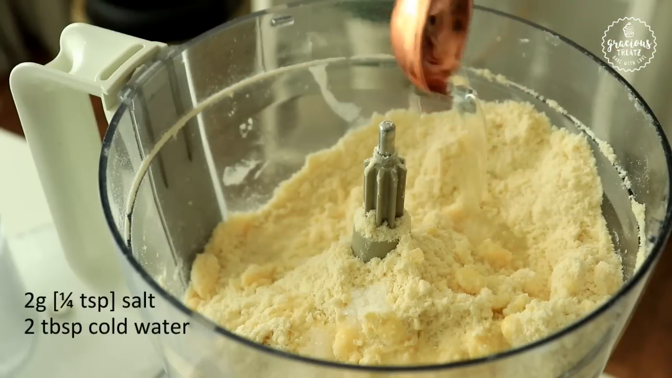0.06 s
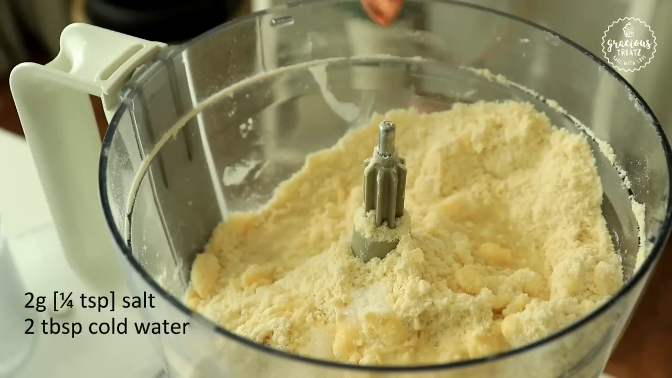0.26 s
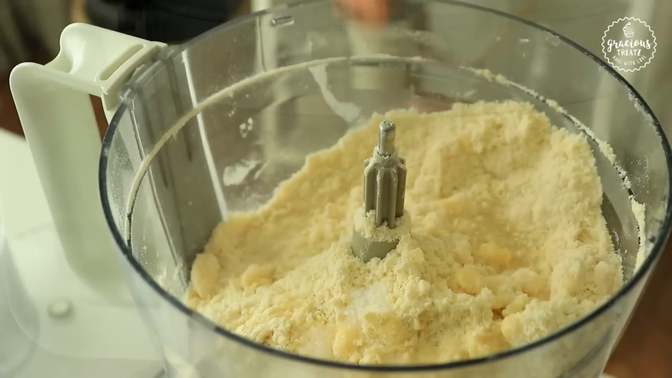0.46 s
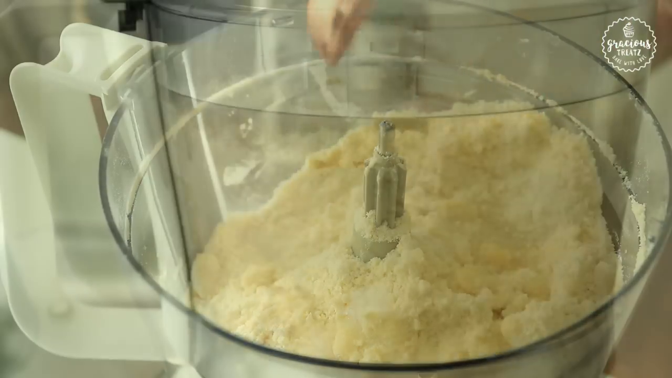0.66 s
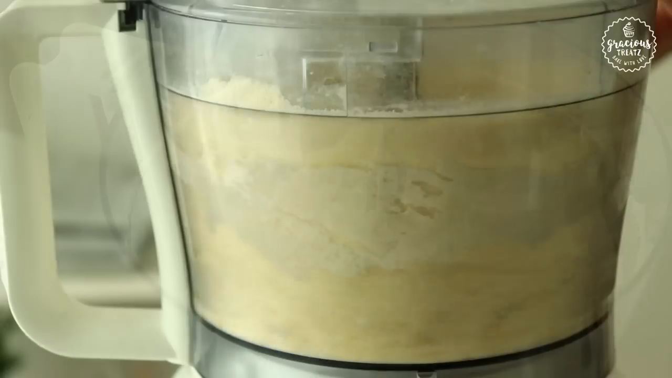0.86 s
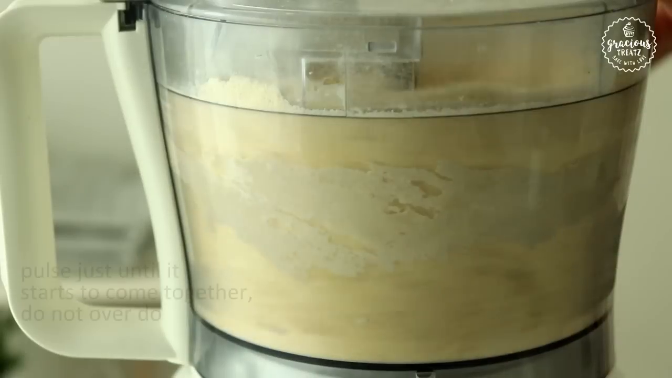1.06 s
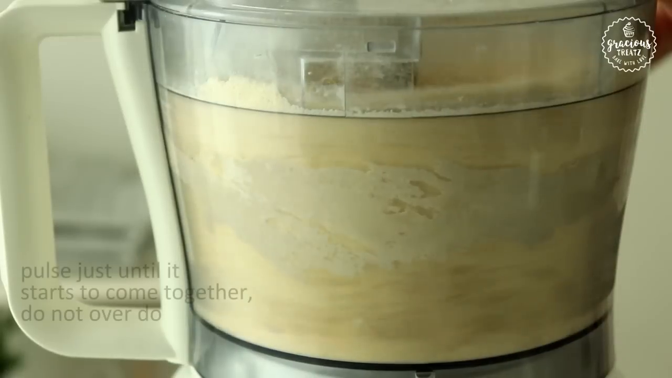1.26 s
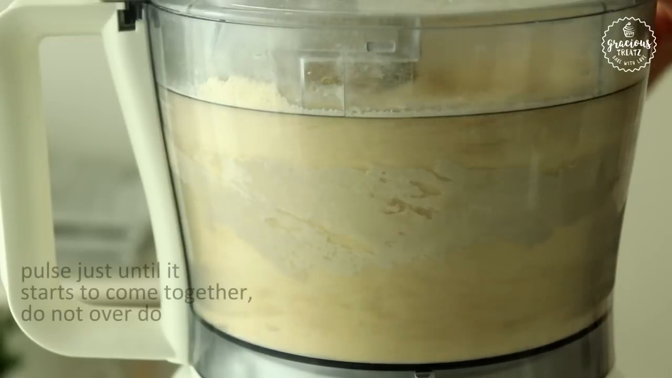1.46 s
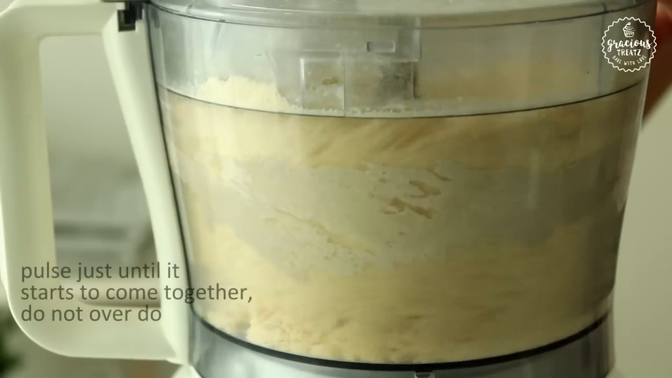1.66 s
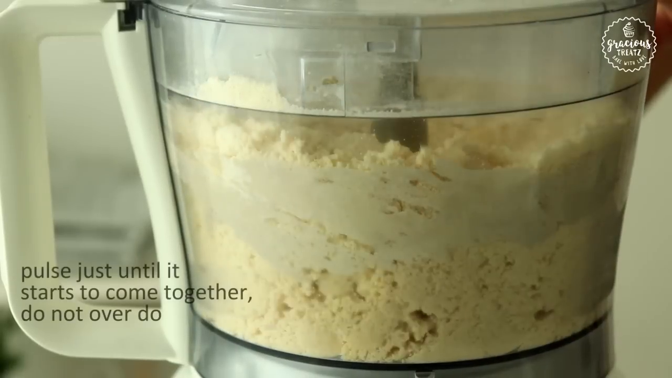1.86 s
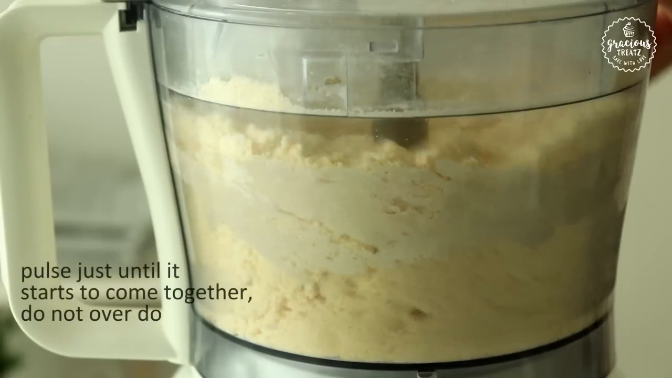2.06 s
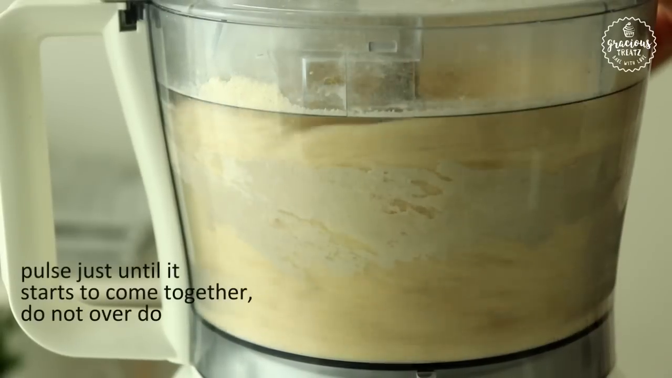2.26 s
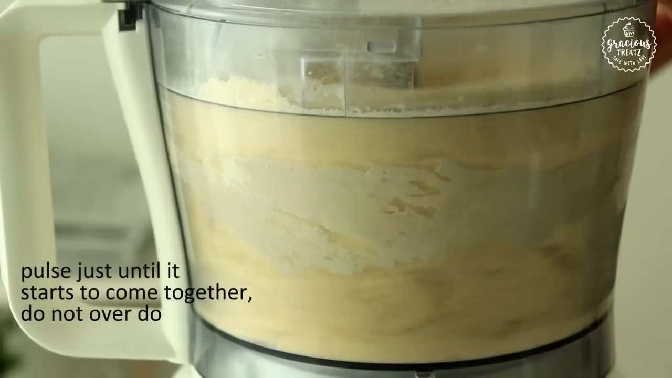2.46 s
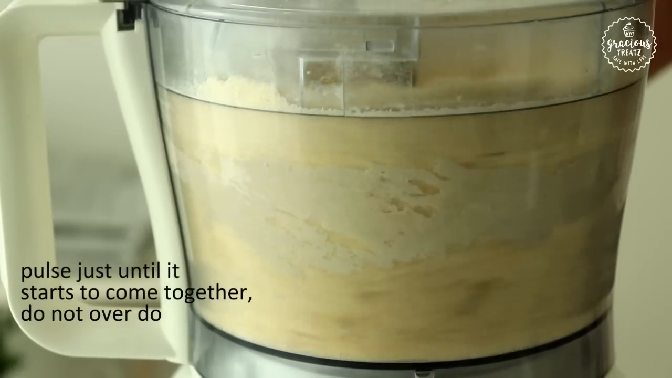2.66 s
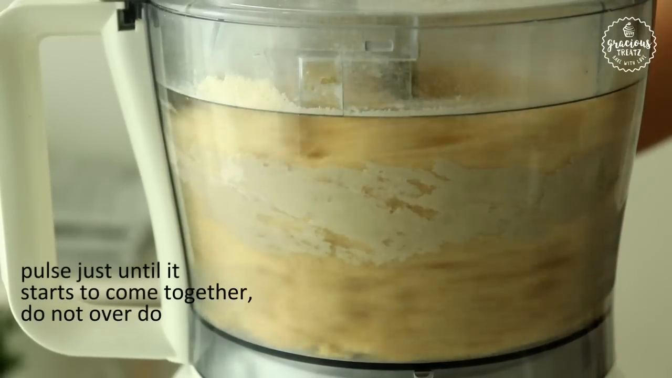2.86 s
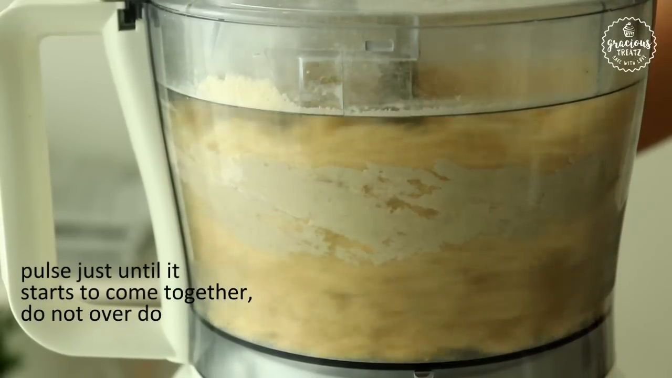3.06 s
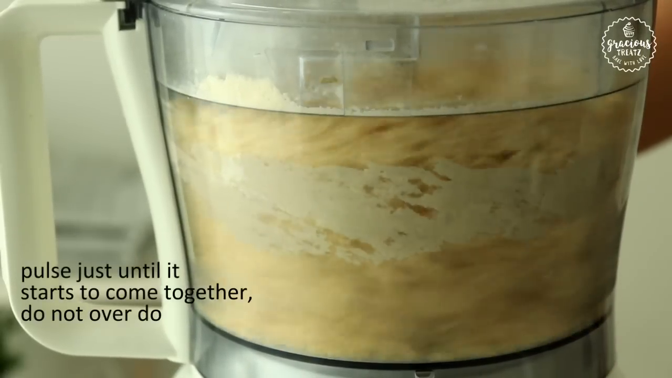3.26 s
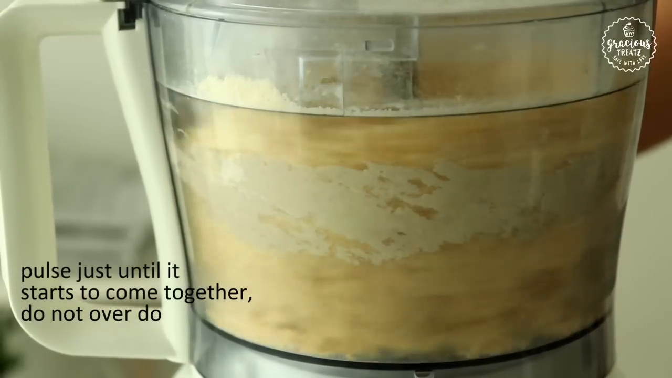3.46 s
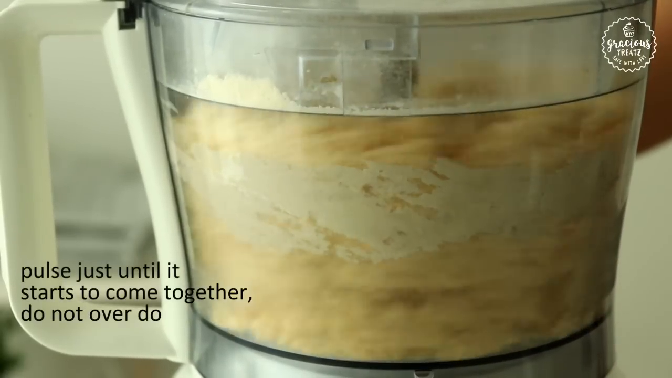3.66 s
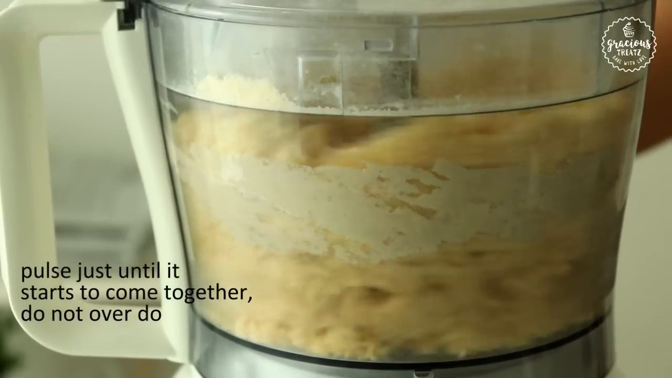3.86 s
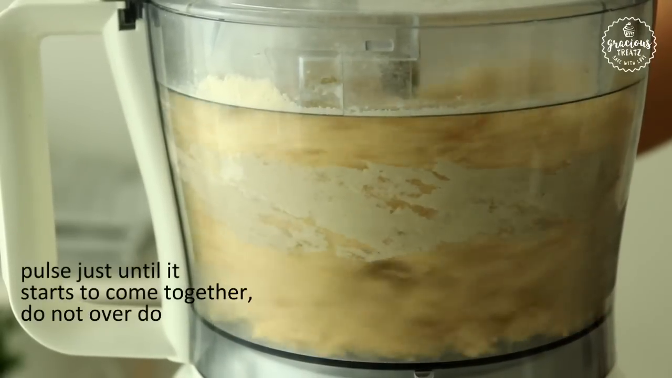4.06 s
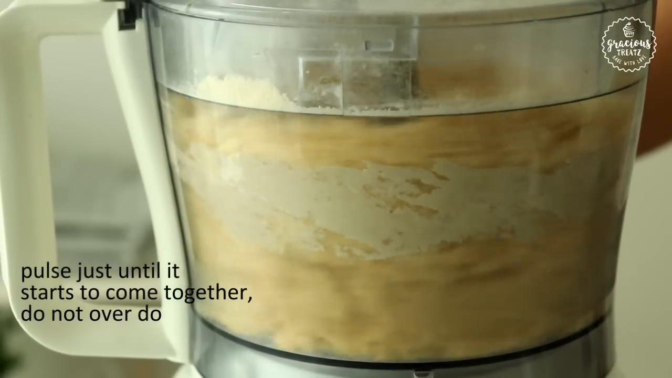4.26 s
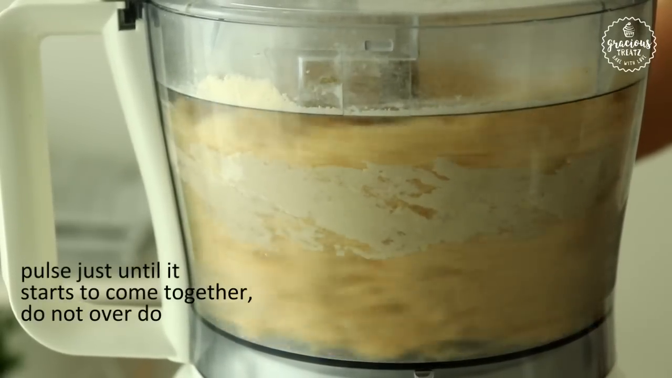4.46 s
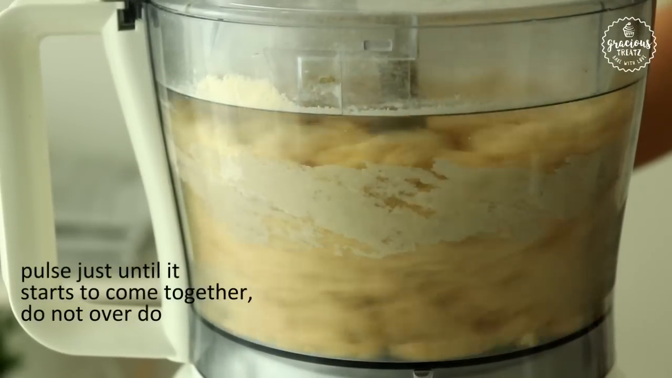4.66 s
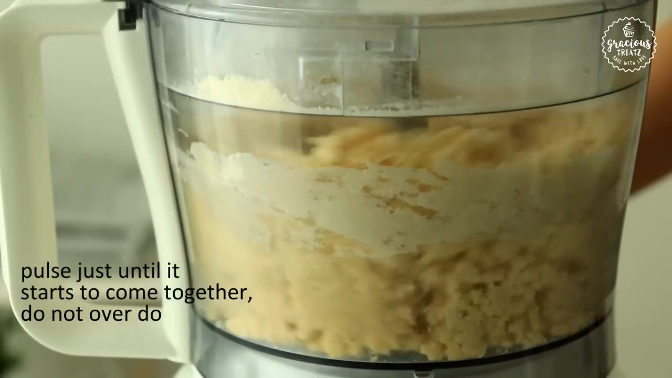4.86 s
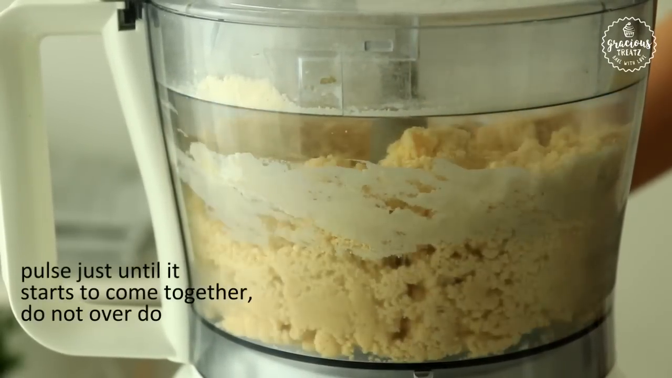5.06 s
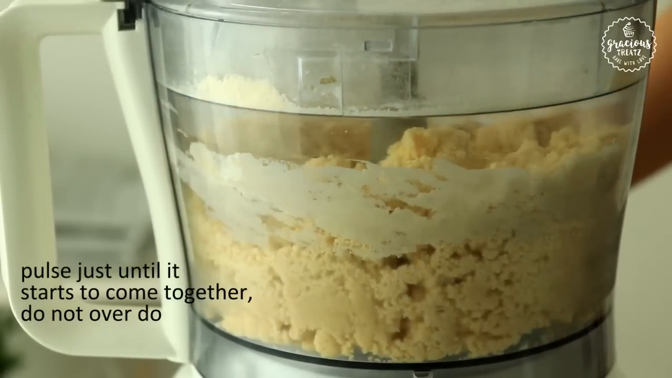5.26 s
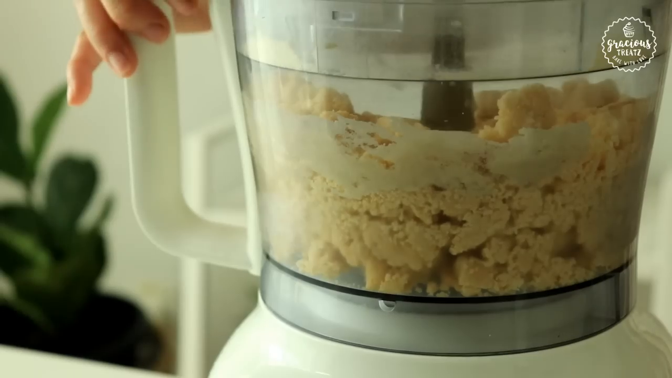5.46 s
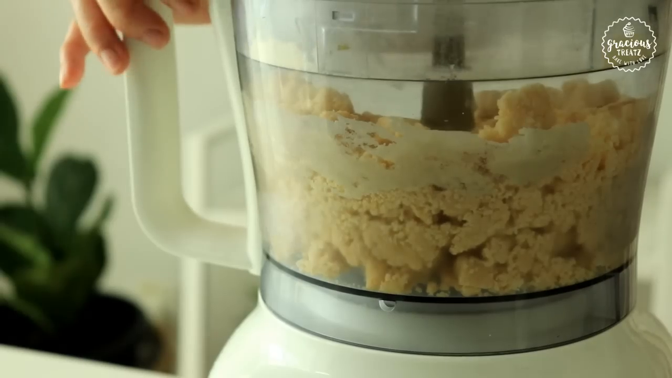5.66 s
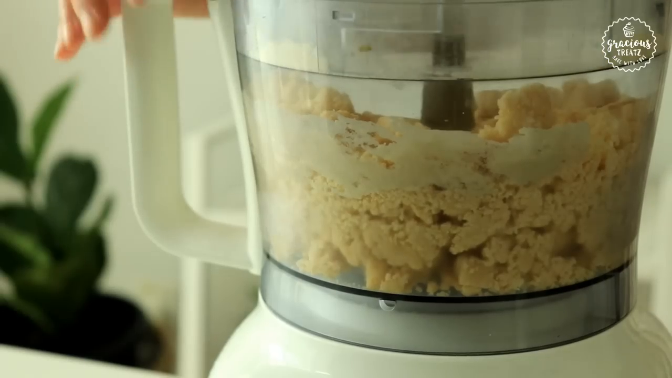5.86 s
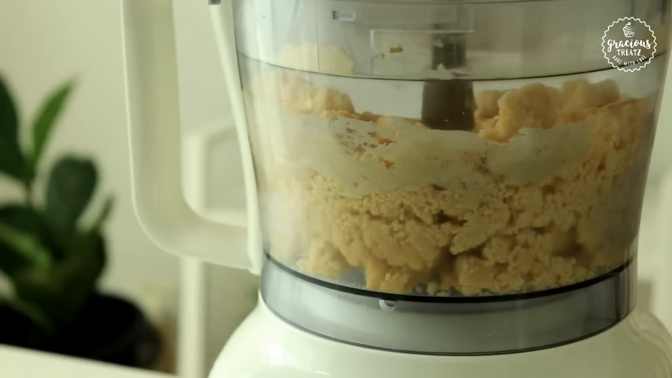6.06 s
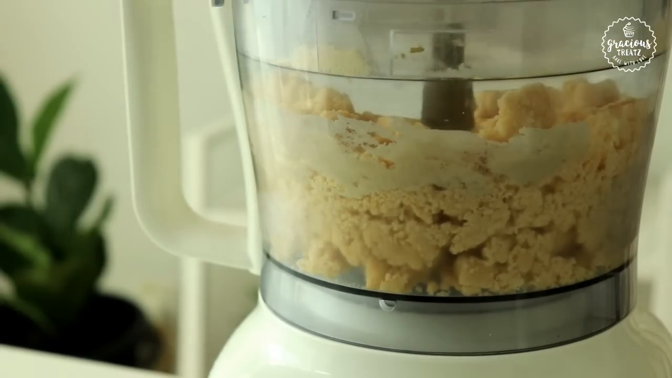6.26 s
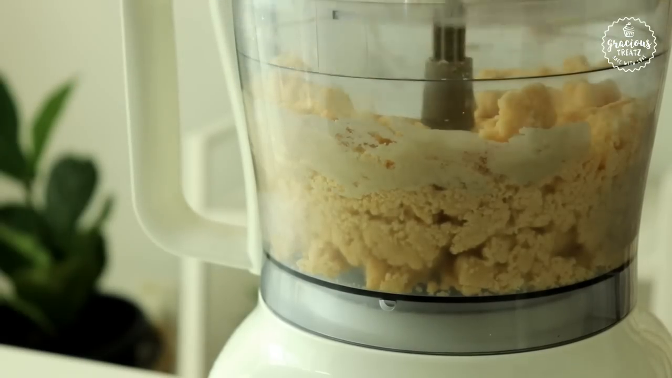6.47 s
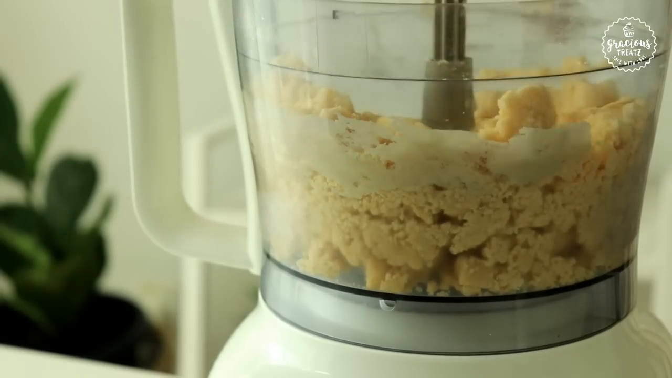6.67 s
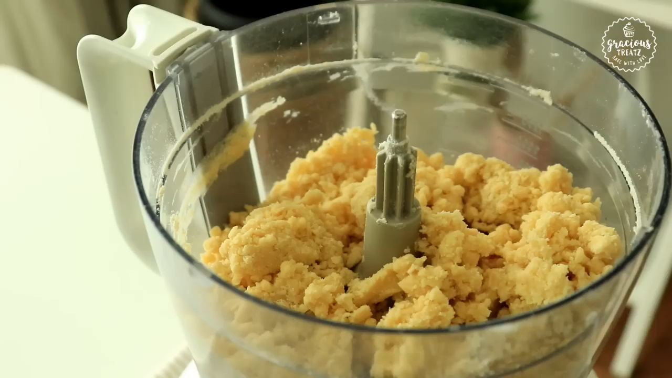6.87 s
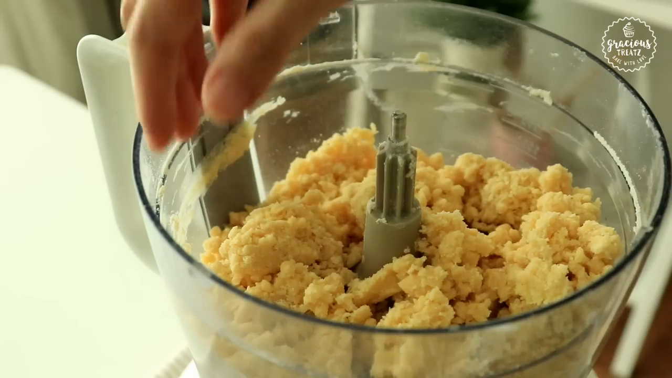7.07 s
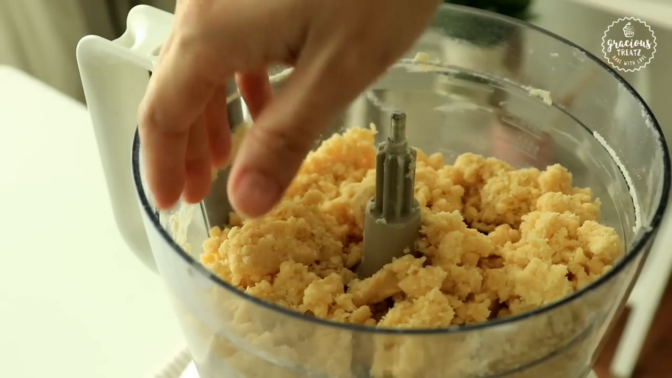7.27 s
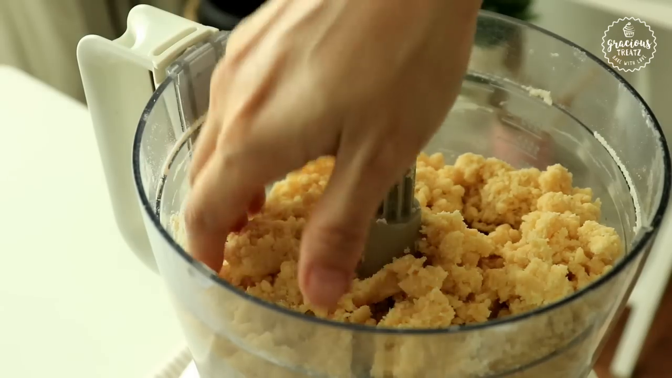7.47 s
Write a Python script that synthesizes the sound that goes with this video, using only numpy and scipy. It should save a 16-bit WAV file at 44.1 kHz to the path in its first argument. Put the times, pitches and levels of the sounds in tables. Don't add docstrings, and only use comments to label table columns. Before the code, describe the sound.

Close in a reverberant kitchen, faint water drips precede a food processor's short burst: a gritty motor roar with a gear whine that spins up, then slides down. A longer, rougher burst follows, with crumbs ticking on the plastic bowl. After a quiet gap the lid latch snaps very loudly, the lid bumps and scrapes loose, and knuckles knock the bowl twice.

```python
import sys
import numpy as np
from scipy import signal
from scipy.fft import rfft, irfft
from scipy.io import wavfile
from scipy.ndimage import uniform_filter1d

SR = 44100
rng = np.random.default_rng(int(sys.argv[2]) if len(sys.argv) > 2 else 0)


def field_ratio(decibels):
    return 10 ** (np.asarray(decibels, dtype=float) / 20)


def output_pcm(signal):
    pcm = np.clip(np.atleast_2d(signal).T, -1, 1) * 32767
    wavfile.write(sys.argv[1], SR, np.round(pcm).astype(np.int16))


N = 332073

# start t/s, end t/s, hiss level/dB, hiss drift/dB, rumble level/dB
ROOM_TONE = [
    (0, 0.459, -67.5, 1, -71.5),
    (0.461, 0.705, -68, -3.5, -81),
    (2.066, 2.1, -73, 0, -90),
    (5.356, 6.751, -71.5, -4.5, -84.5),
    (6.755, 7.53, -68, 1, -75),
]
# f/Hz, level/dB per Hz
HISS = [(41, -27), (70, -4), (103, -4.5), (255, -4.5), (410, -4), (590, -8), (1160, -10), (1670, -11.5),
        (1830, -13.5), (15800, -20.5)]
FAINT_HISS_DB = -87.5
# f/Hz, t60/s
KITCHEN = [(200, 0.63), (1000, 0.52), (4000, 0.44), (12000, 0.5)]
# t/s, peak level/dB, centre f/Hz
TICKS = [(0.074, -49, 2320), (0.182, -50, 7400), (0.198, -41.5, 5200), (0.21, -42.5, 8800),
         (0.235, -47, 1820), (1.925, -56, 1200), (2.048, -62, 3030), (2.066, -43.5, 1600),
         (2.072, -51, 7000), (7.144, -25, 1790), (7.151, -29.5, 1350), (7.185, -50, 1810),
         (7.194, -47, 2020), (7.324, -38, 1360), (5.357, -63, 1500), (6.757, -54, 1200), (7.364, -45, 1410),
         (5.416, -51, 2510)]

# on t/s, off t/s, starting mesh f/Hz, spin-up time/s, starting kick/dB
PULSES = [
    (.695, 1.43, 639.1, .15, -2),
    (2.097, 4.66, 519.8, .122, 2.5),
]
SHOT_ENDS = (2.06, 5.356)
TOP_HZ, IDLE_HZ = 1985, 150
CREEP_SHARE, CREEP_S, COAST_S, CURVE = .16, .5, .255, 1.22
# multiple of mesh rate, level/dB, width as share of the line at 1500 Hz mesh rate, loss/dB per kHz
ORDERS_OF_MESH = [(0.332, -3.5, 0.086, 4.5), (1.001, 2.5, 0.085, 4), (2.001, -3, 0.06, 0.1),
                  (3, -1, 0.08, 7), (4, -4, .08, 7.5)]
FAN_ORDERS = [(3.23, -11.5, 0.05, .1), (4.3, -18.5, 0.035, .1), (6.4, -25, 0.018, .1)]
# f/Hz, level/dB
CASING = [(300, -4), (500, 0), (750, 0.5), (950, -3.5), (1150, 0), (1700, -3.5), (2300, 4), (2700, 1.5),
          (3500, 5.5), (4000, -1.5), (14000, .5)]
# f/Hz, level/dB per Hz
HOUSING = [(15, -63), (25, -26), (70, -27), (165, -9.5), (345, -9.5), (543, -8.5), (612, -14), (741, -6.5),
           (963, -7), (1970, -0.5), (2170, -3.5), (3030, -9.5), (3940, -12), (4540, -17), (7500, -34.5),
           (9750, -57), (16500, -120)]
# f/Hz, width/Hz, level/dB
HOUSING_MODES = [(181, 66, 1), (568, 162, 7.5), (723, 110, 5), (853, 32, 4.5), (1310, 780, 4.5),
                 (1648, 160, 4), (1810, 55, 5.5), (3480, 174, 4.5)]
# f/Hz, level/dB per Hz
CRUMB_HISS = [(2650, -33), (4500, -7.5), (5270, -7.5), (6530, -11.5), (6810, -16), (7370, -16.5),
              (8580, -12), (10200, -17.5), (12900, -15), (15100, -25.5), (15800, -34)]
# f/Hz, width/Hz, level/dB
SPRAY_MODES = [(6430, 200, 4.5), (8500, 200, 5.5), (9600, 180, 4.5), (12800, 220, 6.5)]
# t/s, half length/s, body change/dB, crumb spray change/dB
LUMPS = [
    (2.448, 0.06, -2.5, -3),
    (3.965, 0.047, 1.5, 6),
    (4.078, 0.061, -2.5, 0),
]
BODY_DB, SPRAY_DB, ATTACK_S, KICK_S = -46, -74, 0.017, 0.13
HELD_S, SPRAY_HELD_S, FADE_DB_PER_S, KNEE_S, SPRAY_FADE = 0.32, .36, 117.5, 0.03, 1.2
DULL_HZ, DULL_SHARE = 2600, .3
FREE_ROUGH, GATHER_S, GATHER_LENGTH_S, DRAG_DB = .5, 2.5, .25, -4.5
START_ROUGH_S, START_CLATTER_DB, JOLT_MASKING = .09, 12, 2.5
TONE_DB, SLIP_DB, OVERTONES_DB, SLOW_OVERTONES_DB, OVERTONE_CLARITY = 4.5, 3, 2, -12, .05
RING_HZ, RING_DB, RING_DB_PER_OCTAVE, RING_FALL_DB_PER_OCTAVE = 1310, 5.5, 9, 15.5
HUSH_HZ, HUSH_DB_PER_OCTAVE, COAST_OVERTONES_DB_PER_KHZ, COAST_CLARITY = 500, 12.5, -7, .8
FLARE_HZ, FLARE_WIDTH_HZ, FLARE_DB, FLARE_SWING_DB = 745, 110, -17, 3.5

# t/s, peak level/dB, f/Hz
THUDS = [(0.701, -54.5, 158), (2.099, -54, 122), (2.106, -50.5, 190), (2.106, -43.5, 770),
         (2.105, -54, 500), (2.813, -66, 74), (5.466, -51, 68.4), (5.659, -49.5, 171), (6.756, -51.5, 62.6),
         (7.187, -51, 320), (7.292, -41.5, 561), (7.29, -47, 180.5), (7.323, -50, 86), (7.326, -52, 570)]
# t/s, peak level/dB
CRUMBS = [(.7368, -51), (1.5095, -53), (2.1248, -46), (2.1572, -47), (2.2201, -49), (2.2525, -51),
          (2.6212, -47), (3.0068, -46), (3.1355, -45), (3.3964, -47), (3.4538, -42), (3.597, -41.5),
          (4.024, -54), (4.2036, -43), (4.3318, -51), (4.468, -46), (4.5214, -49), (4.6586, -46)]
# t/s, peak level/dB, centre f/Hz
SPECKS = [(2.625, -65, 11500), (3.01, -66, 14500), (3.465, -66, 11500), (3.488, -62, 14000),
          (3.945, -62, 13000), (3.98, -61, 14500), (4.165, -65, 13500)]
SMALL_CRUMBS_PER_S, SMALL_CRUMB_DB, CRUMB_SPREAD_DB, CRUMB_HZ = 9.3, -55, 5, 4970
# t/s, length/s, level/dB, centre f/Hz, width/Hz
RUBS = [(5.406, 0.052, -59, 786, 400), (5.437, .036, -52, 3420, 7040), (5.9, 0.14, -70, 760, 120),
        (6.325, .2, -70, 745, 90), (6.44, 0.1, -72, 1400, 900), (6.33, .13, -82, 5550, 300),
        (6.4, .05, -80, 6300, 500), (6.49, .05, -74, 5500, 5000), (6.473, .03, -64, 3930, 7040),
        (6.37, 0.2, -69.5, 190, 60), (7.14, .14, -56, 2000, 4000), (7.182, 0.072, -63, 3320, 4000),
        (7.274, 0.043, -56.5, 3960, 6000), (7.284, 0.023, -55.5, 3890, 2920),
        (7.329, .06, -58.5, 2960, 6000)]
# t/s, ring peak level/dB, click over ring/dB
BUMPS = [(5.439, -37, -22), (5.449, -35.5, -17), (5.602, -42, -7), (5.633, -40, -18), (5.665, -37, -20),
         (5.684, -51, -14), (5.72, -54, -14), (5.754, -61, -9), (5.823, -41, -24), (5.956, -62, -11.5),
         (5.995, -56.5, -15.5), (6.413, -54, -7.5), (6.474, -59, -3.5)]
# f/Hz, level/dB, t60/s
BOWL = [(190, -15, 0.067), (712, 6, 0.019), (764, 7, 0.0303), (1450, -5.5, 0.022)]
# level/dB, burst length/s, overload ceiling/dB
LATCH = (-13, .0021, -15.5)
LATCH_S = 5.468
# f/Hz, level/dB per Hz
SNAP = [(180, -48), (300, -18), (1380, 0), (2550, -11), (7360, -13.5), (8130, -11.5), (11700, -22.5),
        (15800, -31.5)]
# f/Hz, level/dB per Hz
LATCH_COLOUR = [(120, -50), (200, -19), (393, -12.5), (499, -20), (610, -13.5), (668, -11.5), (706, -7.5),
                (929, -10), (1310, -1), (1890, -7.5), (2830, -11), (3720, -14), (6810, -14.5), (11200, -24),
                (15800, -41.5)]
# f/Hz, width/Hz, level/dB
LATCH_MODES = [(2870, 300, 3), (5560, 270, 9), (6760, 400, 4.5), (8800, 300, 7)]
ECHO_DB, ECHO_HELD_S, ECHO_FALL_DB_PER_S, ECHO_LENGTH_S = -40, 0.087, 114, 1.1
LATE_DB, LATE_FALL_DB_PER_S, TREBLE_DB, TREBLE_DB_PER_S = -60, 26, -3, 20
# f/Hz, rms level/dB
HUM = (46, -72.5)
# start t/s, end t/s
HUM_SPAN = (5.62, 6.755)
# middle t/s, half length/s, sway level/dB, rumble over it/dB
SWAY = [
    (6.78, 0.38, -55, -30),
    (7.203, 0.097, -54, -6),
    (7.272, 0.054, -53, -3.5),
    (7.347, 0.058, -43.5, -10),
    (7.4, 0.056, -53, -7),
    (7.51, 0.12, -50, -19),
]
SWAY_HZ, SWAY_START_S = 19, 6.756
# (f/Hz, level/dB, t60/s)
KNOCKS = [
    (7.132, -26.5, 8, [(579, -10.5, 0.05), (641, -8, 0.055), (1360, -2.5, 0.037), (2020, 1.5, 0.021), (3140, 1.5, 0.018), (3880, 2, .01), (5240, -3, 0.012)]),
    (7.511, -28.5, 1.2, [(248, -10, 0.07), (348, 9, 0.034), (514, 4.5, 0.042), (1833, -2, 0.042), (3490, 3.5, 0.014), (5330, -6, 0.032), (6300, -6, 0.029), (8020, -12, 0.032)]),
]
# f/Hz, level/dB
SPREAD = [(60, -19.5), (180, -36), (550, -40), (1650, -43), (4970, -37), (15000, -10.5)]


def evened(x):
    return x / np.sqrt(np.mean(x ** 2) + 1e-20)


def wander(noise, size):
    return evened(uniform_filter1d(noise, size=size))


def read(points, hz):
    f, value = np.transpose(points)
    return np.interp(np.log(hz + 1), np.log(f + 1), value)


def add(mix, s, sound):
    part = mix[max(round(s * SR), 0):][:len(sound)]
    part += sound[:len(part)]


def bump(t, middle, half):
    return np.cos(np.pi / 2 * np.clip((t - middle) / half, -1, 1)) ** 2


def coloured(x, spectrum, modes=()):
    hz = np.fft.rfftfreq(len(x), 1 / SR)
    db = read(spectrum, hz)
    db = db + sum(d / (1 + (2 * (hz - f) / w) ** 2) for f, w, d in modes)
    return irfft(rfft(x) * field_ratio(db), len(x))


def resonate(x, hz, width):
    turn = np.exp(2j * np.pi * np.cumsum(hz * np.ones(len(x))) / SR)
    r = np.exp(-np.pi * width / SR)
    once = signal.lfilter([1 - r], [1, -r], x / turn + 1e-18)
    twice = signal.lfilter([1 - r], [1, -r], once)
    return (turn * twice).real


def ring(modes, length=.25):
    t = np.arange(round(length * SR)) / SR
    return sum(field_ratio(db - 60 * t / t60) * np.sin(2 * np.pi * hz * t) for hz, db, t60 in modes)


def burst(t60, length=.05, top_hz=9000):
    t = np.arange(round(length * SR)) / SR
    band = signal.butter(2, [400, top_hz], "band", fs=SR)
    return signal.lfilter(*band, 0.61 * rng.standard_normal(len(t)) * field_ratio(-60 * t / t60))


def kitchen(x):
    taps = np.zeros(SR // 2)
    at = np.arange(300, SR // 2 - 20, 20)
    taps[at + rng.integers(0, 20, len(at))] = rng.choice([-1., 1.], len(at))
    hz, t, z = signal.stft(taps, SR, nperseg=256)
    tail = signal.istft(z * field_ratio(-60 * t / read(KITCHEN, hz)[:, None]), SR, nperseg=256)[1]
    return signal.fftconvolve(x, tail / np.linalg.norm(tail))[:len(x)]


def rumble(count):
    return evened(resonate(resonate(rng.standard_normal(count), 36, 50), 36, 50))


def background(start, end, hiss_db, drift_db, rumble_db):
    count = round((end - start) * SR)
    hiss = evened(coloured(rng.standard_normal(count), HISS))
    hiss_gain = field_ratio(hiss_db + 2.5 + np.linspace(0, drift_db, count))
    return start, hiss_gain * hiss + field_ratio(rumble_db) * rumble(count)


def ticks():
    out = np.zeros(N)
    for s, db, hz in TICKS:
        add(out, s, field_ratio(db) * (0.63 * burst(0.016) + 0.25 * ring([(hz, 0, .012)], .05)))
    return out


def speed(t, on, off, start_hz, spin_s):
    u = np.minimum(t, off) - on
    gap = (1 - CREEP_SHARE) * np.exp(-(u / spin_s) ** CURVE) + CREEP_SHARE * np.exp(-u / CREEP_S)
    driven = TOP_HZ - (TOP_HZ - start_hz) * gap
    coasting = np.exp(-(np.maximum(t - off, 0) / COAST_S) ** CURVE)
    return np.maximum(driven * coasting, IDLE_HZ)


def loudness(t, on, off, kick_db):
    attack_db = -6 * np.exp(-(t - on) / ATTACK_S) + kick_db * np.exp(-(t - on) / KICK_S)

    def fade(held):
        return FADE_DB_PER_S * KNEE_S * np.logaddexp(0, (t - off - held) / KNEE_S)

    fade_db = fade(HELD_S)
    body_db = BODY_DB + attack_db - fade_db
    spray_db = SPRAY_DB - SPRAY_FADE * fade(SPRAY_HELD_S)
    for s, half, body_change_db, spray_change_db in LUMPS:
        body_db = body_db + body_change_db * bump(t, s, half)
        spray_db = spray_db + spray_change_db * bump(t, s, half)
    return body_db, -DULL_SHARE * fade_db, spray_db


def gearing(t, hz, on, off, kick_db):
    driven = t < off
    drag = np.clip((t - GATHER_S) / GATHER_LENGTH_S, 0, 1) * np.clip(1 - (t - off) / .08, 0, 1)
    slip, octaves = 1 - hz / TOP_HZ, np.log2(hz / RING_HZ)
    clatter = np.exp(-((t - on) / START_ROUGH_S) ** 2)
    rough = FREE_ROUGH + (1 - FREE_ROUGH) * np.maximum(drag, clatter)
    clarity = np.where(driven, OVERTONE_CLARITY, COAST_CLARITY)

    jolt_db = -JOLT_MASKING * kick_db * np.exp(-(t - on) / KICK_S)
    driven_db = TONE_DB + SLIP_DB * slip + DRAG_DB * drag + jolt_db
    coasting_db = RING_DB + np.minimum(-RING_DB_PER_OCTAVE * octaves, RING_FALL_DB_PER_OCTAVE * octaves)
    tone_db = np.where(driven, driven_db, coasting_db)

    hush_db = HUSH_DB_PER_OCTAVE * np.minimum(np.log2(hz / HUSH_HZ), 0)
    hush_db = hush_db + COAST_OVERTONES_DB_PER_KHZ * (hz - 900) / 1000
    overtones_db = OVERTONES_DB + np.where(driven, SLOW_OVERTONES_DB * slip, hush_db)
    return rough, clarity, tone_db, overtones_db + START_CLATTER_DB * clatter * slip


def whine(hz, orders, rough, clarity, tone_db, overtones_db):
    out = 0
    for k, db, share, loss_db in orders:
        overtone = k > 1.5
        noise, flutter = rng.standard_normal((2, len(hz)))
        line_hz = np.minimum(k * hz, SR / 2.2)
        fuzz = evened(resonate(noise, line_hz, share * k * 1500))
        tone = np.sqrt(2) * np.sin(2 * np.pi * np.cumsum(line_hz) / SR)
        level_db = db - loss_db * hz / 1000 + read(CASING, line_hz)
        level_db = level_db + (overtones_db if overtone else tone_db) + 2.8 * wander(flutter, 450)
        clear = (1 - rough) * np.clip(clarity if overtone else 1, 0, 1)
        out = out + (np.sqrt(1 - clear) * fuzz + np.sqrt(clear) * tone) * field_ratio(level_db)
    return out


def levelled(x, window=0.097):
    return x / np.sqrt(uniform_filter1d(x ** 2, round(window * SR)) + 1e-12)


def machine(on, off, start_hz, spin_s, kick_db, end):
    t = np.arange(on, end, 1 / SR)
    body_db, dull_db, hiss_db = loudness(t, on, off, kick_db)
    lump_noise, grind, spray_noise, slap_noise, load = rng.standard_normal((5, len(t)))
    steady_hz = speed(t, on, off, start_hz, spin_s)
    gears = gearing(t, steady_hz, on, off, kick_db)
    rough = gears[0]
    hz = steady_hz * (1 + 0.012 * wander(load, 1200))
    blade_phase = 2 * np.pi * np.cumsum(hz / 66) / SR
    turn_phase = 2 * np.pi * np.cumsum(hz / 132) / SR
    blades = 1 + 0.034 * np.cos(blade_phase) + 0.029 * np.cos(turn_phase)

    drive = grind * field_ratio(1.8 * wander(lump_noise, 300)) * blades
    drive = drive + field_ratio(-10.5) * whine(hz, ORDERS_OF_MESH, *gears)
    body = coloured(drive, HOUSING, HOUSING_MODES)
    spray = spray_noise * field_ratio(1.7 * wander(slap_noise, 200)) * blades ** 0.91
    hiss = coloured(spray + whine(hz, FAN_ORDERS, *gears), CRUMB_HISS, SPRAY_MODES)
    body = levelled(body + field_ratio(-7.5) * kitchen(body))
    hiss = levelled(hiss + field_ratio(-7.5) * kitchen(hiss))

    low = signal.sosfiltfilt(signal.butter(2, DULL_HZ, fs=SR, output="sos"), body)
    slap_gain = field_ratio(FLARE_DB + FLARE_SWING_DB * wander(lump_noise, 2500)) * hz / TOP_HZ * rough
    slaps = slap_gain * evened(resonate(slap_noise, FLARE_HZ, FLARE_WIDTH_HZ))
    body = low + field_ratio(dull_db) * (body - low) + slaps
    onset = np.minimum((t - t[0]) / 0.0019, 1)
    return t[0], (field_ratio(body_db) * body + field_ratio(hiss_db) * hiss) * onset


def thuds():
    out = np.zeros(N)
    for s, db, hz in THUDS:
        add(out, s, field_ratio(db) * ring([(hz, 0, .07), (1.3 * hz, -4.5, .05), (2.3 * hz, -13, .03)]))
    return out


def crumbs():
    out, hits = np.zeros(N), list(CRUMBS)
    for on, off, *_ in PULSES:
        for s in np.arange(on, off, 1 / SMALL_CRUMBS_PER_S):
            hit_s = s + rng.random() / SMALL_CRUMBS_PER_S
            hits.append((hit_s, SMALL_CRUMB_DB + CRUMB_SPREAD_DB * rng.standard_normal()))
    for s, db in hits:
        hz = CRUMB_HZ * rng.uniform(0.95, 0.97)
        add(out, s, field_ratio(db + 10.0) * resonate(burst(0.025, top_hz=15000), hz, 3600))
    for s, db, hz in SPECKS:
        add(out, s, field_ratio(db + 12.0) * resonate(burst(0.03, top_hz=16000), hz, 3000))
    return signal.sosfilt(signal.butter(3, 3800, "high", fs=SR, output="sos"), out)


def rubs():
    out = np.zeros(N)
    for s, length, db, hz, width in RUBS:
        noise, grain = rng.standard_normal((2, round(length * SR)))
        grainy = noise * field_ratio(4.2 * wander(grain, 90))
        scrape = evened(resonate(grainy, hz, width))
        add(out, s, field_ratio(db) * scrape * np.linspace(1, 0, len(noise)) ** 1.6)
    return out


def bumps():
    out, onset = np.zeros(N), np.arange(round(.25 * SR))
    for s, db, click_db in BUMPS:
        add(out, s, field_ratio(db) * ring(BOWL) * np.minimum(onset / 220, 1))
        add(out, s, field_ratio(db + click_db) * np.diff(burst(0.027)))
    return out


def latch():
    out, (db, length, ceiling_db) = np.zeros(N), LATCH
    u = np.arange(600) / SR / length
    snap = evened(coloured(rng.standard_normal(600), SNAP)) * u * np.exp(1 - u ** 1.7)
    add(out, LATCH_S, field_ratio(ceiling_db) * np.tanh(field_ratio(db - ceiling_db) * snap))

    age = np.arange(0, ECHO_LENGTH_S, 1 / SR)
    t, treble_db = LATCH_S + .011 + age, TREBLE_DB - TREBLE_DB_PER_S * age
    early_db = ECHO_DB - ECHO_FALL_DB_PER_S * np.maximum(age - ECHO_HELD_S, 0)
    echo_db = np.maximum(early_db, LATE_DB - LATE_FALL_DB_PER_S * age)
    noise, grain = rng.standard_normal((2, len(t)))
    echo = coloured(noise * field_ratio(2.0 * wander(grain, 150)), LATCH_COLOUR, LATCH_MODES)
    low = signal.sosfiltfilt(signal.butter(4, 4300, fs=SR, output="sos"), echo)
    tail = evened(low) + field_ratio(treble_db) * evened(echo - low)
    add(out, t[0], field_ratio(echo_db) * tail * np.minimum((t[-1] - t) / 0.16, 1))
    add(out, LATCH_S + 0.0077, field_ratio(echo_db[0]) * evened(echo[:270]))
    return out


def hum_and_sway():
    out, (hz, db), (start, end) = np.zeros(N), HUM, HUM_SPAN
    t = np.arange(start, end, 1 / SR)
    hum = np.sqrt(2) * np.sin(2 * np.pi * hz * t)
    add(out, start, field_ratio(db) * hum * np.minimum((t - start) / .1, 1))
    t = np.arange(SWAY_START_S, N / SR, 1 / SR)
    rocking = -np.sqrt(2) * np.cos(2 * np.pi * SWAY_HZ * (t - 6.762))
    jolt = rumble(len(t))
    for s, half, sway_db, rumble_db in SWAY:
        add(out, t[0], field_ratio(sway_db) * bump(t, s, half) * (rocking + field_ratio(rumble_db) * jolt))
    return out


def knocks():
    out, onset = np.zeros(N), np.arange(round(.25 * SR))
    for s, db, crack_db, modes in KNOCKS:
        add(out, s, field_ratio(db) * ring(modes) * np.minimum(onset / 40, 1))
        add(out, s, field_ratio(db + crack_db) * burst(0.03, top_hz=6000))
    return out


def scene():
    near = ticks() + thuds() + crumbs() + rubs() + bumps() + knocks()
    mix = near + field_ratio(-6.5) * kitchen(near) + latch() + hum_and_sway()
    mix = mix + field_ratio(FAINT_HISS_DB) * rng.standard_normal(N)
    for pulse, end in zip(PULSES, SHOT_ENDS):
        add(mix, *machine(*pulse, end))
    for rows in ROOM_TONE:
        add(mix, *background(*rows))
    return np.array([mix, mix])


def band_limit(x):
    return signal.sosfilt(signal.butter(12, 15930, fs=SR, output="sos"), x)


def record(dry):
    hz, t, z = signal.stft(dry[0], SR, nperseg=512)
    phase = 2 * np.pi * rng.random(z.shape[::-1]).T
    z = z * field_ratio(read(SPREAD, hz))[:, None] * np.exp(1j * phase)
    side = signal.istft(z, SR, nperseg=512)[1][:N]
    return band_limit(dry + [side, -side])


dry = scene()
out = record(dry)
output_pcm(out)
```